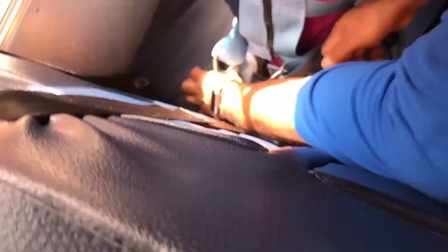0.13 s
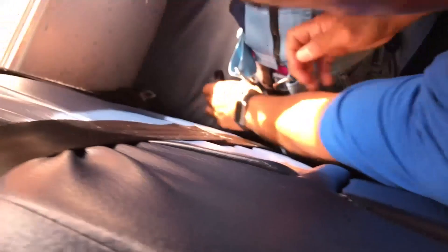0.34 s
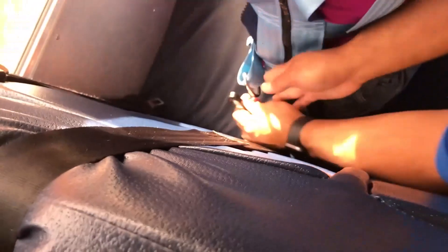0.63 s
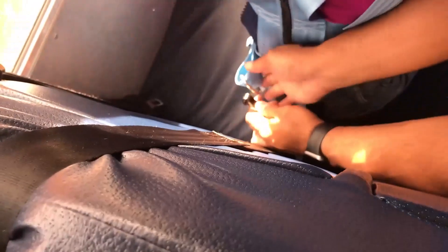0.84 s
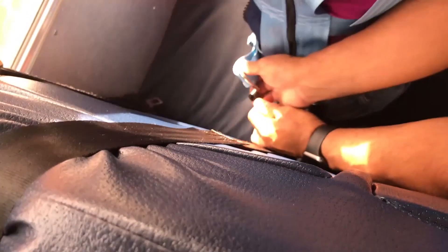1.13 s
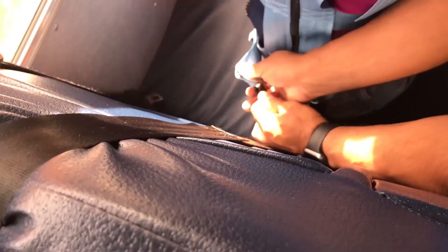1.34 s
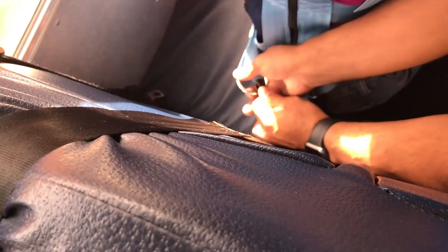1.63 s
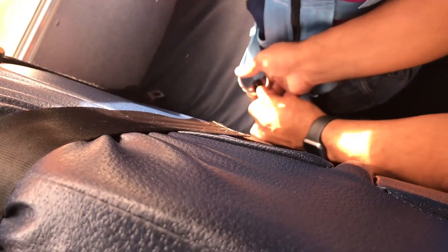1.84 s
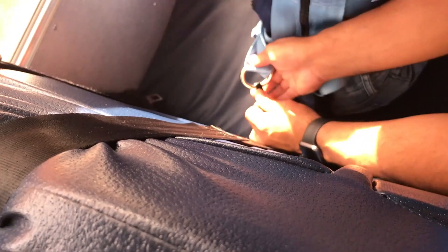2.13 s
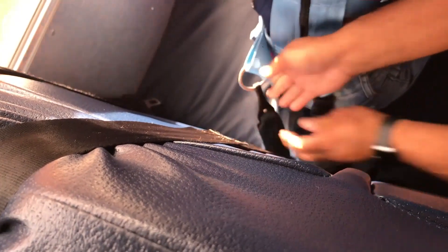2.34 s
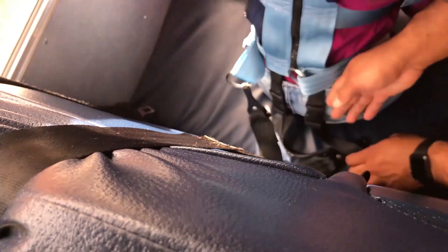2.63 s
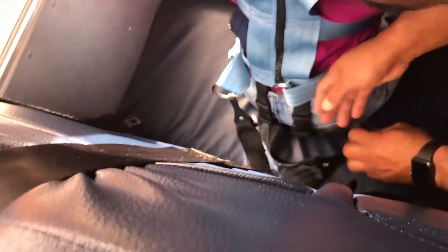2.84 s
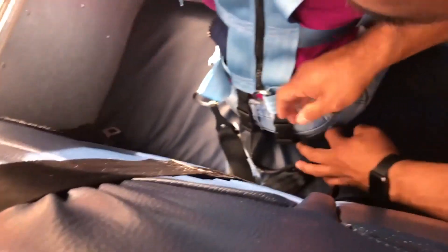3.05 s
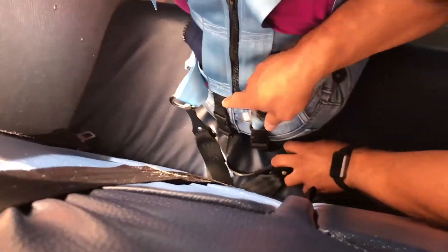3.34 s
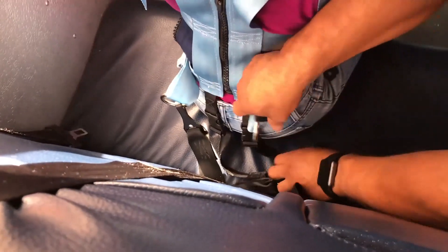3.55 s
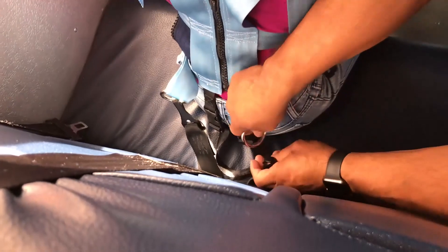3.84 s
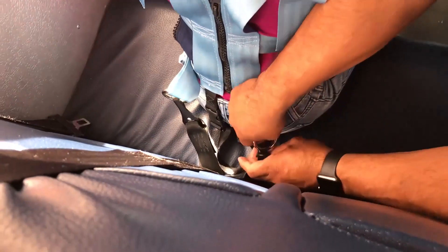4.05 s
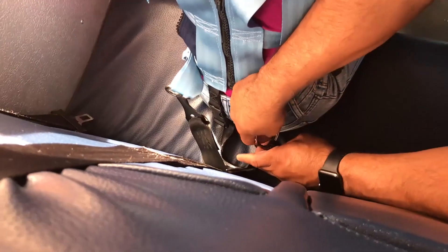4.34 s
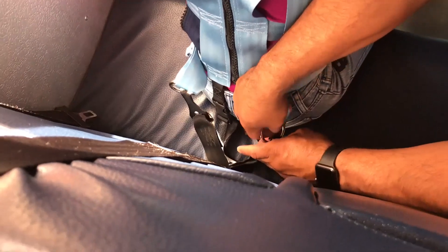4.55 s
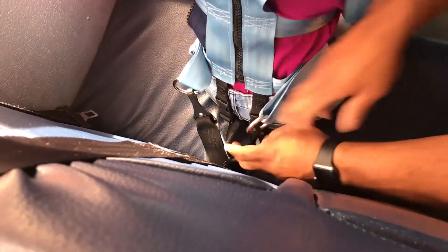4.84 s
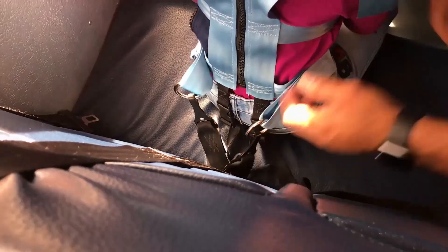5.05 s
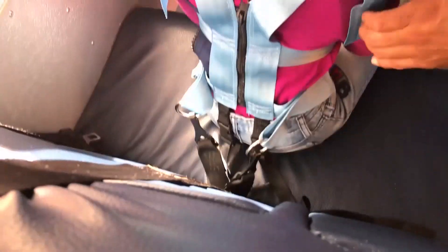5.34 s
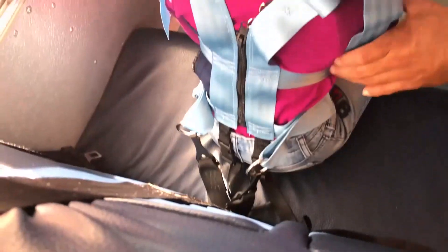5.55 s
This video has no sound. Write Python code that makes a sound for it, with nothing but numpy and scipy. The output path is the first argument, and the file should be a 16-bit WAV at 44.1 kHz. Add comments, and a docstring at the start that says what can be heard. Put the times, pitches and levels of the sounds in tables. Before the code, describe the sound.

Sharp metal clicks of harness hooks being fastened inside an idling vehicle, with soft strap rustling and faint seat knocks.

```python
"""Steel snap hooks clack shut as hands fasten webbing straps in a parked van, heard by a phone on a seat.
Each hook chatters for a few milliseconds and rings its modes. Webbing rasps as its fibres slip;
the vinyl seat creaks, knocks and thuds as weight shifts. Underneath, the idling engine hums through
the cabin and a faint hiss flickers."""
import sys
import numpy as np
from scipy import signal
from scipy.fft import rfft, irfft, next_fast_len
from scipy.io import wavfile
from scipy.ndimage import uniform_filter1d

SR = 44100
rng = np.random.default_rng(int(sys.argv[2]) if len(sys.argv) > 2 else 0)


def wav_record(signal):
    """Record a signal, one row per channel, as 16-bit PCM in the file named by sys.argv[1]."""
    frames = np.transpose(np.atleast_2d(signal))
    bounded = np.clip(frames, -1, 1)
    # unit amplitude maps onto the largest positive 16-bit level
    quanta = np.round(bounded * 32767).astype(np.int16)
    wavfile.write(sys.argv[1], SR, quanta)


N = 250488

# Modes of the steel hook and ring: pitch_hz, relative_db, base_t60_s
HOOK_MODES = [(1880, -4, .05), (2186, -3, .09), (3250, -4, .06), (3620, 0.5, .06), (3920, -2, .07),
              (5560, -16, .03), (5900, -12, .03), (6400, -6, .06), (6870, 0.5, .09), (8500, -11, .03),
              (9340, -9, .06), (11500, -9, .04), (12230, 0.5, .05), (13300, -12, .025), (14010, -10, .025),
              (14900, -9, .03), (15570, -9, .025)]
# Hook hits: start_s, level_db, five band_trim_db (low to high), four ping_hz, other_modes_down_db,
# blow_to_chatter_ratio, chatter_ms, ring_share, t60_ratio
HOOK_HITS = [(0.192, -38, -3.5, -19, -13, -19, -19, 2650, 3000, 6460, 12150, 5, 1, 10, 0.4, 0.3),
             (0.2043, -37, -2.5, -13, -24, -33, -30, 1900, 2870, 6360, 12150, 3.3, 2, 19, 0.2, 0.28),
             (1.017, -54, -10, 1, 4, 0, -12, 2440, 3620, 7000, 12200, 3, 0.5, 4.7, 0.05, 0.22),
             (1.147, -54, -7, 0, -1, -19, -18, 2186, 4200, 6800, 12200, 3, 2, 1.5, 0.2, 0.15),
             (1.156, -25.5, -15.5, -8.5, -3, -9, -7, 1810, 3680, 7050, 12130, 19, 0.73, 7.5, 0.49, 0.21),
             (1.6019, -8, -22, -22, -6, -8, -17, 1850, 3690, 6850, 12040, 8, 0.93, 5.4, 0.6, 0.2),
             (1.6476, -33.5, -25, -13.5, -12.5, -1, -3, 1820, 3250, 8400, 12500, 3, 0.88, 5.8, 0.28, 0.2),
             (1.8655, -37, -10, -6, 1, -25, -35, 1880, 3300, 5700, 12150, 5.4, 1.9, 8.3, 0.13, 0.5),
             (1.92, -32, -6, -0.5, 5, -4, -9, 1820, 4120, 9130, 11900, 24, 1.6, 6.1, 0.4, 0.11),
             (1.95, -10, -17.5, -12, -8.5, -3, -10, 1840, 3340, 5450, 11700, 1.6, 1.8, 4.84, 0.18, 0.51),
             (2.129, -37.5, -11.5, -13, -9, -18, -21, 2186, 3780, 9200, 12000, 4.2, 2.1, 9.3, 0.73, 0.14),
             (2.199, -18, -26, -7, -7, -6, -22, 2170, 3800, 6910, 12200, 5.8, 1.8, 7.3, 0.92, 0.31),
             (2.204, -15, -31, -29, -12, -4, -24, 2120, 3700, 6850, 12320, 3.1, 0.34, 9.8, 1, 0.39),
             (2.282, -34.5, -21, -18.5, -6.5, -9, -19, 2160, 3390, 6350, 12100, 8.3, 1.1, 18, 1, 0.78),
             (2.4328, -34, -15.5, -9, -19, -38, -35, 1810, 3770, 6750, 12150, 6.9, 2.5, 3.7, 0.88, 0.55),
             (3.97, -45.5, -6, -33, -1, -19, -25, 1780, 3700, 6500, 12300, 3.2, 1.5, 1.1, 0.56, 0.45),
             (4.1042, -26.5, -22, -16.5, -12, -3, -7.5, 1880, 3800, 6780, 12200, 3, 0.42, 8.9, 0.4, 0.15),
             (4.297, -41, -7, 1.5, -15, -13, -30, 2450, 3910, 6980, 12300, 30, 1.1, 4.5, 0.92, 0.38),
             (4.434, -47, -6, -17, -12, -2, -7, 1860, 3560, 6870, 12000, 2.5, 1.8, 3.6, 0.32, 0.44),
             (4.4541, -8, -21.5, -10, -3, 2, -3.5, 1950, 3660, 6780, 12320, 0.83, 0.13, 5.8, 0.52, 0.13),
             (4.462, -29.5, -10.5, -8.5, -5, -2, -2, 1880, 3420, 6420, 12200, 1.8, 0.3, 21, 0.27, 0.42),
             (4.6, -34.5, -26, -13.5, -18, -51, -49, 2450, 3820, 6920, 11900, 11, 3.1, 2.1, 0.88, 1),
             (5.1175, -43, -11.5, -16, -23, -12.5, -22, 1880, 3075, 5580, 12150, 3.3, 1.2, 7.5, 0.074, 0.89)]
BAND_EDGES_HZ = (900, 3000, 5400, 10000, 13000, 16500)


def hook_clicks():
    """A sharp blow and a chatter of tiny steel contacts crack broadband and ring the hook's modes."""
    out, t = np.zeros(N), np.arange(SR // 8) / SR
    bands = [signal.butter(4, edges, "band", fs=SR, output="sos")
             for edges in zip(BAND_EDGES_HZ, BAND_EDGES_HZ[1:])]
    for row in HOOK_HITS:
        (start_s, level_db), trims_db, pings_hz = row[:2], row[2:7], row[7:11]
        others_down_db, blow_ratio, chatter_ms, ring_share, t60_ratio = row[11:]
        blow = blow_ratio * np.exp(-((t - .0013) / .0005) ** 2)
        chatter = (1 - np.exp(-(t / .0015) ** 2)) * np.exp(-(1000 * t / chatter_ms) ** 2.2)
        crack = rng.standard_normal(len(t)) * (blow + chatter + 1e-9)
        hz, mode_db, t60_s = np.transpose(HOOK_MODES)
        mode_db = mode_db - others_down_db + 1.5 * rng.standard_normal(len(hz))
        # strike point and grip favour the mode nearest each ping and pull it to that pitch
        favoured = [np.argmin(abs(hz - ping)) for ping in pings_hz]
        hz[favoured], mode_db[favoured] = pings_hz, 0
        modes = np.sin(2 * np.pi * np.outer(hz, t)) * decay(t, t60_ratio * t60_s[:, None])
        ring = signal.fftconvolve(crack[:SR // 20], undb(mode_db) @ modes)[:len(t)]
        for band, trim_db in zip(bands, trims_db):
            attack = unit_peak(signal.sosfilt(band, crack))
            tone = unit_peak(signal.sosfilt(band, ring))
            blend = (1 - ring_share) * attack + ring_share * tone
            add(out, undb(level_db + trim_db) * unit_peak(blend), start_s)
    return out - resonate(out, hz=10500, width_hz=1400)  # one notch colours every click


# Ring-outs after the chatter: start_s, pitch_hz, level_db, t60_s
RING_OUTS = [(1.165, 7046, -48.5, .12), (1.165, 6890, -53, .1), (1.604, 6855, -21.5, .035),
             (1.61, 6870, -42.5, 0.11), (1.608, 6860, -49, 0.16), (1.61, 9380, -51, 0.17),
             (1.61, 2200, -52.5, 0.16), (1.651, 8730, -54, 0.098), (1.652, 12700, -56, 0.12),
             (2.208, 12180, -23.5, 0.044), (2.212, 3590, -44, 0.087), (2.225, 6916, -50, 0.11),
             (2.52, 5345, -52, .1), (4.465, 12100, -47, 0.2), (4.465, 12430, -47.5, 0.16),
             (4.465, 3570, -51, 0.17), (4.49, 3290, -64.5, .3), (4.48, 6430, -55.5, 0.16),
             (4.49, 6890, -61.5, 0.23), (4.49, 5920, -63.5, .2), (4.49, 9350, -65, 0.19)]


def hook_ring_outs():
    """Single modes of a free-hanging hook ring on and fade."""
    out, t = np.zeros(N), np.arange(SR // 5) / SR
    for start_s, hz, level_db, t60_s in RING_OUTS:
        envelope = (1 - np.exp(-t / .0021)) * decay(t, t60_s)
        add(out, undb(level_db) * envelope * np.sin(2 * np.pi * hz * t), start_s)
    return out


# Fader for the hook sliding on its ring: time_s, level_db
SCRAPE_FADER = [(2.42, -82), (2.438, -57.5), (2.478, -55.5), (2.566, -69), (2.59, -93), (2.6, -99)]


def hook_scrape():
    """Sliding steel keeps two middle modes of the hook singing."""
    rub = grains(per_s=1500, spread_db=1.5)
    level_db, = curves(SCRAPE_FADER, left=-140, right=-140)
    singing = sum(unit(resonate(rub, hz, width_hz=25)) for hz, _, _ in HOOK_MODES[7:9])
    return undb(level_db) * unit(singing)


# EQ of the strap's rustle and of its bright fibre hiss: frequency_hz, gain_db
RUSTLE_EQ = [(590, -10), (1000, 4), (1250, -4), (2860, -3.5), (3860, 1.5), (4830, -6.5), (6000, -3.5),
             (7800, -41.5), (13200, -120)]
FIBRE_EQ = [(2940, -32.5), (5000, -10.5), (7880, -2), (11700, -5.5), (15200, -8), (16200, -31.5),
            (16500, -44)]
# Faders for webbing pulled through the hands: time_s, rustle_db, fibre_db
STRAP_PULLS = [(0.0, -64.5, -71), (0.5, -66, -64), (0.75, -65, -71), (1.4, -71.5, -76.5), (1.7, -84, -89.5),
               (2.1, -67, -72.5), (2.14, -61.5, -62), (2.58, -63, -69), (2.65, -75.5, -78), (3.1, -71, -71),
               (3.2, -66, -71), (3.7, -66, -71.5), (4.0, -72.5, -78), (4.4, -75.5, -80), (4.7, -65, -68),
               (4.86, -67.5, -69), (4.89, -84, -84.5), (5.15, -71.5, -76), (5.68, -77.5, -76.5)]
# Short tugs on top: middle_s, length_s, rustle_boost_db, fibre_boost_db
STRAP_TUGS = [(0.21, 0.024, 7, 10), (0.44, 0.093, 5.5, -12), (0.95, 0.031, 10, 6), (1.44, 0.019, 8.5, 9),
              (1.66, 0.15, 16.5, 22), (1.87, 0.046, 18.5, 14), (1.92, 0.063, 20, 20), (2.29, 0.019, 9, 8),
              (2.6, 0.094, 7, -10.5), (2.785, 0.056, 9.5, 10), (2.53, 0.016, 6, 13.5),
              (3.128, 0.018, 1.5, 10.5), (3.2, 0.031, 16, 11), (3.25, 0.041, 10, 4),
              (3.58, 0.047, 11.5, 11), (3.66, 0.026, 10.5, 10.5), (3.97, 0.061, 11, -7),
              (4.3, 0.046, 9.5, 11), (4.49, 0.13, 11, 14.5), (4.605, 0.023, 12.5, -10),
              (5.13, 0.022, 4.5, 7.5), (5.32, 0.061, 7, 2), (5.39, 0.03, 4, 9)]


def webbing(dip_db):
    """Pulled webbing rasps in dense fibre slips; stitches catch and let go as a fine crackle."""
    pull_db, tug_db = curves(STRAP_PULLS), swells(STRAP_TUGS)
    rustle_db, fibre_db = pull_db + tug_db + dip_db
    slips = grains(per_s=1500, spread_db=1) + 1.7 * rng.standard_normal(N)
    drag_db = 2.5 * walk(60)
    rustle = undb(rustle_db + drag_db - 3.5) * colour(slips, RUSTLE_EQ)
    fibres = undb(fibre_db + drag_db) * colour(slips, FIBRE_EQ)
    catches = grains(per_s=1400, spread_db=4)
    stitches = undb(rustle_db - 9.5) * unit(resonate(catches, hz=6800, width_hz=4900))
    flicker_db = pull_db[0] + 0.4 * tug_db[0] + dip_db - 1
    return rustle + fibres + stitches + undb(flicker_db) * rustle_flicker(slips)


def rustle_flicker(slips, per_s=170):
    """Brief bands of noise at random pitches and widths flicker through the rustle."""
    out = np.zeros(N)
    for _ in range(int(per_s * N / SR)):
        start, length_s, width_hz = rng.integers(N), rng.uniform(.025, .07), rng.uniform(200, 1600)
        hz = np.clip(3335 * 2 ** rng.normal(0, .8), 1300, 13000)
        gain = undb(np.clip(rng.normal(0, 2), -4, 3)) * np.sqrt(width_hz / hz)
        piece = slips[start:start + int(SR * length_s)]
        add(out, gain * np.hanning(len(piece)) * steep(piece, hz, width_hz), start / SR)
    return unit(out)


# Resonances of the hollow under the seat cover: pitch_hz, base_width_hz, relative_db
SEAT_MODES = [(340, 45, -6), (470, 50, -3), (545, 45, -4), (630, 50, -4), (755, 45, 0), (945, 45, -4),
              (1060, 50, -5), (1180, 55, -10), (1380, 60, -14), (1530, 80, -12), (1790, 80, -15),
              (2440, 100, -14)]
# Fader for slowly shifting weight: time_s, relative_db
CREAK_FADER = [(0.0, -52), (0.25, -62), (0.45, -59.5), (1.0, -60.5), (2.3, -65.5), (2.5, -69.5),
               (2.7, -59.5), (3.05, -68), (3.2, -44.5), (3.45, -58), (3.7, -54.5), (4.0, -65.5), (4.7, -59),
               (5.68, -73.5)]
# Sudden shifts of weight: middle_s, length_s, boost_db
WEIGHT_SHIFTS = [(0.1, 0.086, 15), (0.215, 0.19, 14), (1.39, 0.11, 5.5), (1.61, 0.015, 13.5),
                 (1.87, 0.025, 17.5), (1.955, 0.012, 39.5), (2.15, 0.023, 13), (2.21, 0.068, 17.5),
                 (2.43, 0.18, 21), (2.585, 0.061, 29), (3.37, 0.1, 14), (3.55, 0.026, 9),
                 (4.21, 0.04, 12.5), (4.46, 0.042, 16), (4.6, 0.055, 7.5)]


def seat_creak(dip_db):
    """The cover sticks and slips over its hollow, whose resonances a resting body damps and broadens."""
    creak_db = curves(CREAK_FADER)[0] + swells(WEIGHT_SHIFTS)[0] - 11.5
    stick_slip = grains(per_s=2500, spread_db=.8)
    hollow = np.zeros(N)
    for hz, width_hz, mode_db in SEAT_MODES:
        flutter_db = 6.7 * np.clip(walk(22.017), -2, 1.5)
        dip_share = min(hz / 2500, 1)  # low modes duck least
        hollow += undb(mode_db + flutter_db + dip_share * dip_db) * steep(stick_slip, hz, 1.3 * width_hz)
    return undb(creak_db) * unit(hollow)


# Hollow knocks on the seat: start_s, peak_db, focus_hz, push_ms (capped at 40)
SEAT_KNOCKS = [(0.044, -57, 283, 48), (0.099, -41, 463, 2.4), (0.165, -38, 600, 24),
               (0.2035, -31.5, 590, 6.2), (0.219, -41.5, 583, 12), (0.263, -50.5, 560, 16),
               (0.304, -49, 518, 21), (2.433, -56, 540, 10), (2.552, -50, 806, 10), (2.575, -43.5, 590, 31),
               (2.594, -60, 1010, 9.7), (2.599, -52.5, 2440, 27), (3.309, -48.5, 880, 20),
               (3.336, -47, 524, 14), (3.338, -49.5, 2460, 29), (3.382, -51, 740, 8.6),
               (3.43, -47, 1000, 7.5), (3.554, -50, 940, 2.6), (3.604, -49.5, 800, 8.9),
               (4.201, -55, 550, 5), (4.456, -49, 770, 8.9)]


def seat_knocks():
    """A short rough push rings the seat hollow, favouring the modes near its focus pitch."""
    out, t = np.zeros(N), np.arange(SR // 5) / SR
    for start_s, peak_db, focus_hz, push_ms in SEAT_KNOCKS:
        release = np.exp(-(1000 * t / min(push_ms, 40)) ** 2) + 1e-9
        push = rng.standard_normal(len(t)) * (1 - np.exp(-t / .009)) * release
        push[0] = 7.4  # hard first contact
        knock = sum(undb(mode_db - 22.4 * abs(np.log2(hz / focus_hz))) * steep(push, hz, width_hz)
                    for hz, width_hz, mode_db in SEAT_MODES)
        add(out, undb(peak_db) * unit_peak(knock), start_s)
    return out


# Dull thuds through the seat: start_s, peak_db, pitch_hz, t60_s
SEAT_THUDS = [(0.018, -45.5, 232, 0.1), (0.043, -38.5, 223, 0.051), (0.098, -37, 248.5, 0.14),
              (0.203, -38, 139, 0.011), (0.224, -34.5, 245, 0.035), (1.952, -44, 168, 0.061),
              (2.842, -48.5, 129.6, 0.17), (3.132, -48.5, 208, 0.053), (3.14, -37.5, 80, 0.195),
              (3.193, -45.5, 186, 0.061), (3.597, -42, 131, 0.063), (4.2, -38.5, 174, 0.044),
              (4.459, -35.5, 190, 0.041)]


def seat_thuds():
    """Soft pushes ring the seat frame for a few cycles."""
    out, t = np.zeros(N), np.arange(SR // 4) / SR
    for start_s, peak_db, hz, t60_s in SEAT_THUDS:
        envelope = (1 - np.exp(-t / .004)) * decay(t, t60_s)
        body = np.sin(2 * np.pi * hz * t) + 0.5 * steep(rng.standard_normal(len(t)), hz, 2.2 * hz)
        add(out, undb(peak_db) * unit_peak(envelope * body), start_s)
    return out


# Short clear notes from the seat: middle_s, pitch_hz, peak_db, length_s
SEAT_NOTES = [(0.232, 1980, -55, 0.04), (0.306, 547, -60, .05), (2.454, 770, -51.5, 0.037),
              (2.562, 372, -56, 0.03), (2.57, 1086, -55, 0.027), (2.577, 782, -45.5, 0.049),
              (2.614, 492, -53.5, 0.077), (2.623, 313, -55.5, 0.085), (2.603, 1184, -51.5, .035),
              (2.608, 1508, -50.5, 0.027), (3.35, 344, -54, 0.073), (3.348, 978, -55, 0.063),
              (3.364, 748, -39.5, 0.032), (3.365, 950, -51, 0.077), (3.371, 458, -53, 0.053),
              (3.39, 1053, -55.5, .04), (3.436, 762, -50.5, 0.053), (3.434, 1054, -55, 0.042),
              (3.54, 742, -49.5, 0.024), (3.56, 780, -49, 0.028)]


def seat_notes():
    """The hollow sounds pure notes, each swelling and dying in one smooth arch."""
    out, t = np.zeros(N), np.arange(N) / SR
    for middle_s, hz, peak_db, length_s in SEAT_NOTES:
        arch = np.cos(np.pi * np.clip((t - middle_s) / length_s, -.5, .5)) ** 2
        out += undb(peak_db) * arch * np.sin(2 * np.pi * hz * t)
    return out


# Fader for the engine's firing tone: time_s, level_db
IDLE_FADER = [(0.0, -46), (0.2, -51), (0.36, -58), (0.45, -48.5), (0.63, -55), (0.75, -48), (1.5, -48.5),
              (2.2, -52.5), (2.7, -51), (2.9, -48.5), (3.05, -51.5), (3.25, -48.5), (3.6, -50), (4.1, -48),
              (4.55, -51.5), (5.0, -46.5), (5.45, -48.5), (5.68, -47)]
# EQ of the cabin rumble: frequency_hz, gain_db
RUMBLE_EQ = [(15, -46), (25, 0), (54, 1), (70, -13), (97, -12), (114, -20.5), (193, -22.5), (257, -23),
             (400, -31), (520, -61.5), (880, -120)]


def engine_idle(firing_hz=44.9):
    """The firing tone wavers; its second order beats against a lower body boom; dull rumble fills in."""
    firing_db = curves(IDLE_FADER)[0] + 0.5 * walk(9.2)
    phase = 2 * np.pi * np.cumsum(firing_hz + 0.85 * walk(23)) / SR
    body_boom = steep(rng.standard_normal(N), hz=78.3, width_hz=35)
    second_order = 0.68 * np.sqrt(2) * np.sin(2 * phase + 0.8 * walk(7.7))
    rumble_eq = [(hz, db) for hz, db in RUMBLE_EQ if hz < 36 or hz > 100]
    rumble = colour(rng.standard_normal(N), rumble_eq) * undb(-60 + 0.5 * walk(2.9))
    cabin_boom = undb(-6.5) * steep(rng.standard_normal(N), firing_hz, width_hz=27)
    low_hum = undb(firing_db) * (np.sqrt(2) * np.sin(phase) + cabin_boom)
    upper_hum = undb(-56.5 + 1.9 * walk(6.7)) * (second_order + 0.52 * body_boom)
    return low_hum + upper_hum + rumble


# EQ of the background hiss: frequency_hz, gain_db
HISS_EQ = [(180, -31), (300, -2), (627, 0), (767, 4), (2210, -11), (10500, -29.5), (12400, -21.5),
           (15700, -17.5), (16500, -39)]


def hiss(dip_db, level_db=-72):
    """A faint bed of broadband hiss that flickers."""
    return undb(level_db + walk(35) + dip_db) * colour(rng.standard_normal(N), HISS_EQ)


# Brief dips in the webbing, creak and hiss: middle_s, length_s, depth_db
LEVEL_DIPS = [(0.091, 0.011, -34), (0.188, 0.014, -41), (0.225, 0.015, -36), (0.274, 0.012, -16),
              (0.46, 0.01, -10), (0.527, 0.011, -14), (0.624, 0.0096, -5), (0.761, 0.018, -12.5),
              (0.976, 0.02, -6.5), (1.051, 0.012, -7.5), (0.836, 0.053, -18), (1.139, 0.019, -20),
              (1.181, 0.017, -36), (1.413, 0.0052, -15), (1.574, 0.012, -3), (1.787, 0.019, -4),
              (1.825, 0.0076, -4.5), (2.008, 0.012, 0), (2.095, 0.077, -9.5), (2.354, 0.035, -28.5),
              (2.465, 0.012, -28), (2.612, 0.031, -26), (2.993, 0.0086, -1.5), (3.143, 0.008, -7.5),
              (3.293, 0.007, -10), (2.703, 0.089, -19), (2.819, 0.03, -40), (3.362, 0.049, -38.5),
              (3.539, 0.024, -31), (3.852, 0.0085, -16), (3.916, 0.042, -32), (4.016, 0.023, -13),
              (4.265, 0.028, -9.5), (4.545, 0.025, -16.5), (4.627, 0.028, -72), (5.038, 0.027, -10),
              (5.329, 0.023, -5), (5.435, 0.04, -13)]


def dips(edge_s=.008):
    """Ducking curve in dB: flat-bottomed dips with quick edges."""
    t = np.arange(N) / SR
    return sum(depth_db * np.clip((length_s / 2 - abs(t - middle_s)) / edge_s + .5, 0, 1)
               for middle_s, length_s, depth_db in LEVEL_DIPS)


def cabin_reverb(x, t60_s=.08, wet_db=-23):
    """The padded cabin adds a short diffuse tail."""
    t = np.arange(SR // 4) / SR
    tail = rng.standard_normal(len(t)) * decay(t, t60_s) * (t > .004)
    return x + undb(wet_db) * signal.fftconvolve(x, tail / np.linalg.norm(tail))[:N]


def undb(db):
    """Gain of a level in dB."""
    return 10 ** (np.asarray(db) / 20)


def unit(x):
    """Scale to rms 1."""
    return x / np.sqrt(np.mean(x ** 2))


def unit_peak(x):
    """Scale to peak 1."""
    return x / np.abs(x).max()


def decay(t, t60_s):
    """Fade by 60 dB every t60_s."""
    return np.exp(-np.log(1000) * t / t60_s)


def curves(table, **ends):
    """One fader curve per level column of rows (time_s, levels...)."""
    times_s, *columns = np.transpose(table)
    return [np.interp(np.arange(N) / SR, times_s, column, **ends) for column in columns]


def swells(table):
    """Sum of smooth bumps for rows (middle_s, length_s, boosts_db...)."""
    t = np.arange(N) / SR
    return sum(np.array(boosts_db)[:, None] * np.exp(-4 * ((t - middle_s) / length_s) ** 2)
               for middle_s, length_s, *boosts_db in table)


def colour(x, eq):
    """Shape x with (frequency_hz, gain_db) points; rms 1."""
    hz, db = np.transpose(eq)
    size = next_fast_len(len(x))
    log_hz = np.log(np.arange(size // 2 + 1) * SR / size + 1)
    gain = undb(np.interp(log_hz, np.log(hz), db, left=-90, right=-90))
    return unit(irfft(rfft(x, size) * gain, size)[:len(x)])


def resonate(x, hz, width_hz):
    """Two-pole resonance, gain 1 at the centre."""
    return signal.lfilter(*signal.iirpeak(hz, hz / width_hz, fs=SR), x)


def steep(x, hz, width_hz):
    """The same resonance twice, for steep flanks; rms 1."""
    return unit(resonate(resonate(x, hz, width_hz), hz, width_hz))


def walk(rate_hz):
    """Smooth random drift: held levels slewed twice; rms 1."""
    hold = int(SR / rate_hz)
    steps = np.repeat(rng.standard_normal(N // hold + 1), hold)
    return unit(uniform_filter1d(uniform_filter1d(steps, hold), hold)[:N])


def grains(per_s, spread_db):
    """Slips at random moments, a few stronger than most."""
    slips = (rng.random(N) < per_s / SR) * rng.standard_normal(N)
    return slips * undb(spread_db * np.minimum(rng.exponential(size=N), 3))


def add(out, x, start_s):
    """Mix x into out from start_s."""
    i = int(start_s * SR)
    out[i:i + len(x)] += x[:N - i]


def scene():
    """Mono mix: hooks up front, then webbing and seat, over the engine and hiss."""
    dip_db = dips()
    steel = cabin_reverb(hook_clicks() + hook_ring_outs()) + hook_scrape()
    seat = seat_thuds() + seat_knocks() + seat_notes() + seat_creak(dip_db)
    return (steel + webbing(dip_db) + seat + engine_idle() + hiss(dip_db))[None]


def record(dry, low_cut_hz=30, high_cut_hz=15900):
    """The phone drops the deepest bass and cuts the top."""
    dry = signal.sosfilt(signal.butter(2, low_cut_hz, "high", fs=SR, output="sos"), dry)
    return signal.sosfilt(signal.ellip(8, .2, 70, high_cut_hz, fs=SR, output="sos"), dry)


dry = scene()
out = record(dry)
wav_record(out)
```